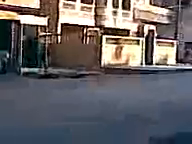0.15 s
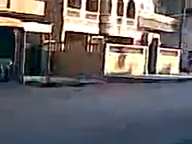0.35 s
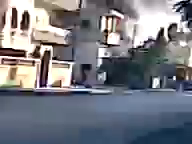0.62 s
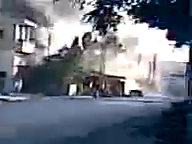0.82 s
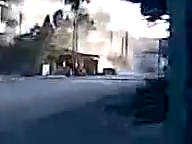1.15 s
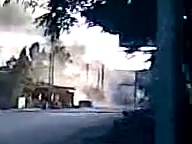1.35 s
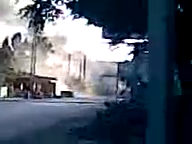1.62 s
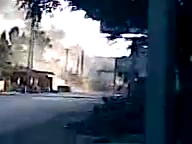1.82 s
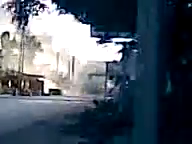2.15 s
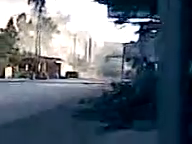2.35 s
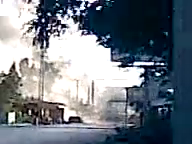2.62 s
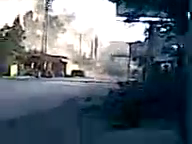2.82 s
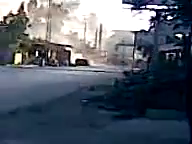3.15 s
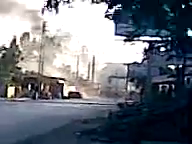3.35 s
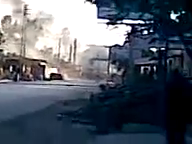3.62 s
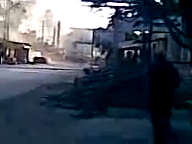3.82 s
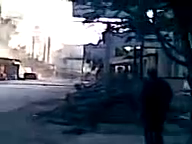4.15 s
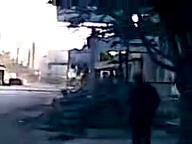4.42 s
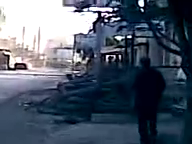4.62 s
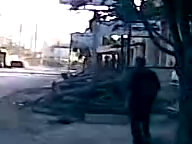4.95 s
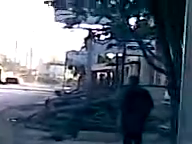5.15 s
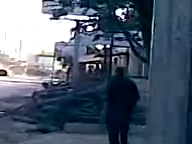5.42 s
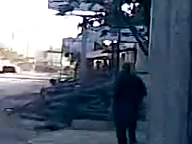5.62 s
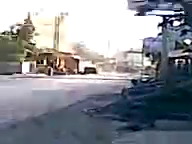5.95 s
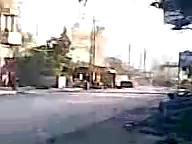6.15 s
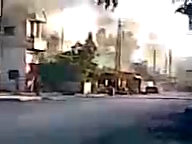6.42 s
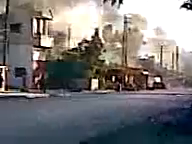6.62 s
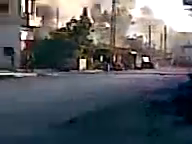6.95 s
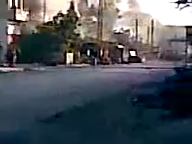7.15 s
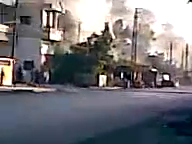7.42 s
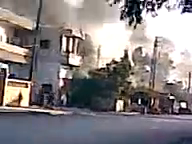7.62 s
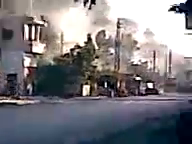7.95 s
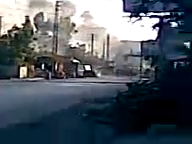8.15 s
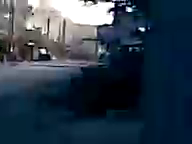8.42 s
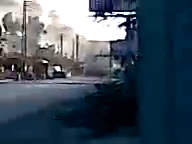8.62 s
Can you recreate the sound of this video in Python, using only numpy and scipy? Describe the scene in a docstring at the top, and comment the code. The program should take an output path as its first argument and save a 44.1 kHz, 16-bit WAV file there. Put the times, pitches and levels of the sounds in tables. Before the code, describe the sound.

Overloaded phone sound of street gunfire: a quick burst, sparse distant pops, then heavy close rifle cracks and a rolling, booming finish.

```python
"""Town street under gunfire: close rifle shots, bursts from a gun further off and far shots roll between house fronts.
Close shots and rolling echoes are coloured noise in two layers, a low boom and a bright crack.
Bursts, far shots and high snaps add short decaying rings, each with an echo in the same two layers.
A narrow-band phone microphone overloads on the close shots, and the loudest peaks are cut flat."""
import sys
import numpy as np
from scipy import signal
from scipy.fft import rfft, irfft, next_fast_len
from scipy.io import wavfile
from scipy.ndimage import uniform_filter1d

SR = 44100
rng = np.random.default_rng(int(sys.argv[2]) if len(sys.argv) > 2 else 0)


def digitize_waveform(pressure):
    """Quantize a signal to 16-bit integers and store it at the path in sys.argv[1].

    Rows of a 2-D input are taken as channels; values are limited to [-1, 1].
    """
    field = np.atleast_2d(pressure).T
    bounded = np.clip(field, -1, 1)
    quanta = np.round(bounded * 32767).astype(np.int16)
    wavfile.write(sys.argv[1], SR, quanta)


def magnitude_from_level(level_db):
    """Linear magnitude for a level in decibels (20 dB per decade)."""
    exponent = np.asarray(level_db, float) / 20
    return 10 ** exponent


N = 386757  # length in samples

# Close shots, and the rolling blast after 7 s:
# start_s, level_db, crack_over_boom_db, echo_t60_s, boom_lag_s (behind the crack)
CLOSE_SHOTS = [(3.54, -1, 0.5, 0.81, .001), (4.266, -1, -1.5, 0.89, .001), (5.066, -1, -2.5, 0.97, 0.002),
               (5.946, -1.5, -0.5, 0.86, 0.0011), (6.962, 1, -1, 0.64, 0.0029),
               (7.167, -14.5, 13.5, 0.5, 0.049), (7.199, 1.5, -1.5, 0.57, 0.024),
               (7.27, -17, 16, .7, 0.036), (7.294, -2.5, -6, 1, 0.0098), (7.874, -2.5, 1, 0.87, .001),
               (8.355, -0.5, -0.5, 0.75, 0.00091), (8.63, 1, -1.5, 0.69, 0.00089)]
# How a close shot comes back from the street, on top of its own decay: after_shot_s, boom_db, crack_db
STREET_RETURNS = [(0, -24.5, -2.5), (.012, -2, 2.5), (.035, -1.5, 0.5), (.06, -2, -2), (.09, -3.5, -5.5),
                  (0.119, -4, -0.5), (.125, -2, 2), (.16, -3.5, 0), (0.221, 1, -2), (0.319, -1, 3.5),
                  (.45, -1.5, -3), (.6, 5.5, 4.5), (.72, -6.5, -5)]
# Bursts of a gun down the street:
# start_s, level_db, ring_hz, crack_echo_over_blast_db, boom_echo_over_blast_db
GUN_BURSTS = [(0.195, -3, 1060, -19, -14.5), (0.242, -1.5, 671, -5.5, -10), (0.352, -2.5, 663, -8, -9),
              (0.461, -2.5, 656, -13, -7), (0.551, -6, 665, -7, -0.5), (0.642, 1, 666, -15.5, -10),
              (0.751, 2, 740, -20.5, -16), (0.844, 0, 675, -17.5, -8), (3.975, -7.5, 990, -6.5, -3),
              (4.091, -15, 974, -6.5, 2), (4.654, -3, 920, -6.5, -8), (4.777, -4.5, 834, -9, -2.5),
              (4.855, -2.5, 978, -9.5, -5), (4.953, 2, 943, -17.5, -11), (5.017, -3.5, 860, -14, -5.5),
              (5.216, 1, 814, -11, -8.5), (5.303, -2.5, 764, -9.5, -11), (5.411, 5.5, 840, -19, -17)]
# Short high-pitched snaps and slaps, most just ahead of a louder blast:
# start_s, level_db, ring_hz, crack_echo_over_snap_db, echo_t60_s
HIGH_SNAPS = [(0.201, 3.5, 1716, -11, 0.24), (5.618, 5, 1450, -7, 0.1), (6.909, -7, 3020, -21.5, 1),
              (8.334, -6.5, 2520, -30, .2)]
# Single far shots and sharp slaps off the houses:
# start_s, level_db, crack_echo_over_blast_db, boom_echo_over_blast_db
FAR_POPS = [(1.008, -23, -7, -2.5), (1.069, -16, -29, -7), (1.213, -18, -8, -1), (1.41, -28, -0.5, 7),
            (1.773, -33.5, -24, 2.5), (1.998, -37, -2, 4), (2.035, -38, 2, 0.5), (2.246, -35, -3, 0.5),
            (2.277, -42.5, 6.5, 7), (2.472, -35.5, -4, 2), (2.513, -36, -1, -4.5), (2.591, -20.5, 1, 5),
            (2.698, -22, -32, 2), (2.722, -26, 2, -9.5), (2.841, -6, -19, -9.5), (2.855, -14, -5, -10),
            (2.974, -22.5, -1.5, -1), (3.047, -10.5, -11, -4.5), (3.054, -7, -9, -9),
            (3.176, -20, -2.5, 0.5), (3.213, -8.5, -30, -12.5), (3.414, -14, -24, -9),
            (3.447, -15, -26, -4), (3.494, -12, -34, -14.5), (4.815, -18.5, -5.5, -2), (5.676, -5, -11, -7),
            (5.704, -0.5, -31, -6.5), (5.776, -5, -10, -12.5), (5.799, -2, -16, -6),
            (5.914, -6, -29, -13.5), (7.093, -3.5, -22, -5), (7.114, -5, -7.5, -8),
            (7.497, -6.5, -3.5, -7.5), (7.582, 0, -16.5, -15), (8.074, -6.5, -23, -19.5)]
# Lingering echo and far firing: time_s, boom_db, crack_db, boom_centre_hz
ROLLING_ECHO = [(0, -15, -11.5, 600), (.06, -23, -20.5, 680), (.19, -29, -31, 580), (.4, -26, -27, 650),
                (.9, -22, -34, 640), (1.05, -27.5, -40.5, 520), (1.19, -27, -41.5, 529),
                (1.4, -29, -36, 516), (1.48, -28.5, -27, 650), (1.6, -28.5, -37.5, 540),
                (1.67, -39, -36, 520), (1.82, -37.5, -36.5, 520), (2.0, -50.5, -47.5, 560),
                (2.2, -51, -48, 540), (2.45, -50, -50.5, 540), (2.68, -33, -37.5, 560),
                (3.1, -31, -33.5, 600), (3.25, -24, -36.5, 580), (3.38, -39.5, -38.5, 560),
                (3.6, -33.5, -33, 600), (3.72, -21, -22, 560), (3.979, -27, -27, 650),
                (4.06, -22.5, -22, 570), (4.26, -30, -27.5, 580), (4.5, -27.5, -26, 580),
                (4.6, -26, -30, 600), (4.7, -29, -25, 800), (5.0, -26, -30.5, 860), (5.2, -29, -21.5, 620),
                (5.6, -25, -28, 570), (5.74, -10.5, -13.5, 510), (5.94, -18.5, -22, 510),
                (6.2, -26.5, -25.5, 600), (6.5, -33, -27, 580), (6.6, -41.5, -30, 600),
                (6.66, -44.5, -36, 590), (6.71, -49, -46, 590), (6.93, -60, -54, 600),
                (7.15, -22, -22.5, 480), (7.261, -10.5, -15.5, 430), (7.31, -17, -10, 430),
                (7.37, -7, -6.5, 450), (7.5, -14, -15, 480), (7.66, -16, -13.5, 500),
                (7.85, -20.5, -18, 500), (8.15, -17, -31, 540), (8.35, -31, -25.5, 550),
                (8.45, -16, -17, 520), (8.6, -21, -21.5, 540), (8.7, -21, -17, 500),
                (8.77, -13.5, -17, 500)]
# Basic spectrum of the boom, before its moving colour: freq_hz, relative_db
BOOM_SPECTRUM = [(18, -56.5), (30, -11.5), (97, -15.5), (234, -4.5), (357, 0), (419, -1.5), (508, -1),
                 (638, -1), (697, -3.5), (990, -2.5), (2000, -22.5), (2600, -42.5), (4400, -120)]
# Basic spectrum of the crack, before its moving colour: freq_hz, relative_db
CRACK_SPECTRUM = [(500, -52.5), (900, -9.5), (1250, -4.5), (1800, -4.5), (2400, -8), (3100, -8.5),
                  (3600, -7.5), (4700, 2.5), (6000, -30)]
# Moving colour of the echo, before its slow wander: time_s, crack_centre_hz, crack_hump_db, middle_db
ECHO_COLOUR = [(0, 2100, 4.5, 3), (.25, 2040, 2.5, 4.5), (.4, 2630, 7, 2.5), (.65, 2900, 8.5, 3.5),
               (.95, 2795, 11, 2.5), (1.15, 2753, 9.5, -6.5), (1.4, 3100, 9.5, -2.5), (1.5, 3270, 6.5, 3),
               (1.68, 2500, 1, -1), (2.55, 2585, 7, 2.5), (2.6, 3530, 12, 2.5), (2.7, 2550, 11, 1),
               (2.86, 3230, 4.5, 5), (3.1, 2740, 1.5, 3), (3.2, 2960, 5, 0), (3.5, 2510, 6, -3.5),
               (4.6, 2397, 8.5, 0.5), (5.6, 2310, 6.5, -0.5), (6.4, 2400, 10, 2.5), (6.65, 2260, 20, 5),
               (6.85, 2266, 4.5, 3), (6.91, 2850, 23, -5), (6.97, 2400, 7.5, 0), (7.15, 2464, 9, 1.5),
               (7.19, 2634, 6.5, -2.5), (7.33, 2680, 7.5, -9.5), (7.4, 2443, 6, -0.5), (8.77, 2510, 8, 0)]
# Bass in the echo, before its lag and wander: time_s, bass_db
ECHO_BASS = [(0, 2), (.5, -3.5), (1, -2), (1.6, 5), (2.1, 4), (2.6, 2.5), (3.3, 3), (3.55, -2), (4.2, 2.5),
             (4.7, -0.5), (5.1, -2.5), (5.6, 1.5), (6.1, 3), (6.5, -4), (7, 2.5), (7.6, 3), (8.3, 0),
             (8.77, -2)]
# Narrow band of the phone: freq_hz, gain_db
PHONE_BAND = [(20, -30), (45, -5), (100, -2), (3400, -1), (3700, -10), (4000, -21.5), (4300, -34),
              (4550, -48.5), (4800, -90.5), (5000, -120)]

FLAT_TOP = 0.72  # peak ceiling, full scale = 1
POP_HZ, POP_SPREAD, POP_T60_S = 560, 0.08, 0.28  # mean ring, its relative spread, echo decay
BURST_T60_S = 0.1
SNAP_BOOM_DB = -8  # boom echo against crack echo
CRACK_WANDER_HZ, BASS_WANDER_DB, MIDDLE_WANDER_DB = 80, 1, 2  # rms
WANDER_S = 0.17  # smoothing window
BASS_LAG_PER_DB, BASS_LAG_S = 0.3, 0.031  # the bass gathers later than the rest of the boom


def read(points, hz):
    """Reads a spectrum joined by straight lines on a log frequency axis."""
    f, value = np.transpose(points)
    return np.interp(np.log(hz + 1), np.log(f + 1), value)


def colour(x, points):
    """Filters x by a spectrum in dB."""
    size = next_fast_len(len(x) + 4096)
    gain = magnitude_from_level(read(points, np.fft.rfftfreq(size, 1 / SR)))
    return irfft(rfft(x, size) * gain, size)[:len(x)]


def evened(x):
    """Scales to rms 1."""
    return x / np.sqrt(np.mean(x ** 2) + 1e-20)


def add(mix, s, sound):
    """Adds a sound into the mix at s seconds."""
    part = mix[..., max(round(s * SR), 0):][..., :sound.shape[-1]]
    part += sound[..., :part.shape[-1]]


def wander(s):
    """Slow random drift of rms 1, read at the times s."""
    drift = evened(uniform_filter1d(rng.standard_normal(N), size=round(WANDER_S * SR)))
    return drift[np.minimum(s * SR, N - 1).astype(int)]


def close_echoes():
    """Power of boom and crack after each close shot: the street's pattern on the shot's own decay."""
    after, boom_db, crack_db = np.transpose(STREET_RETURNS)
    t = np.arange(0, after[-1], 1 / SR)
    street_boom_db, street_crack_db = np.interp(t, after, boom_db), np.interp(t, after, crack_db)
    power = np.zeros((2, N))
    for s, db, over_db, t60, lag in CLOSE_SHOTS:
        fall_db = db - 60 * t / t60
        add(power[0], s + max(lag, 0), magnitude_from_level(street_boom_db + fall_db) ** 2)
        add(power[1], s, magnitude_from_level(street_crack_db + fall_db + over_db) ** 2)
    return power


def blasts(table, cycles, bounce_s, bounce_db):
    """Each blast arrives as a few cycles of a dying ring, with a ground bounce close behind."""
    t, out = np.arange(SR // 20) / SR, np.zeros(N)
    for s, db, hz, *_ in table:
        envelope = magnitude_from_level(db - 20 * (t * hz / cycles) ** 3)
        attack = np.minimum(t * hz / 0.92, 1)
        ring = envelope * np.sin(2 * np.pi * hz * t) * attack
        add(out, s, ring)
        add(out, s + bounce_s, magnitude_from_level(bounce_db) * ring)
    return out


def gun_bursts():
    """Rapid blasts from down the street, each ringing at its own pitch with a faint bounce."""
    return blasts(GUN_BURSTS, cycles=4.4, bounce_s=0.011, bounce_db=-24)


def high_snaps():
    """Snaps and slaps: very short, high-pitched rings with a quick bounce."""
    return blasts(HIGH_SNAPS, cycles=2.5, bounce_s=0.003, bounce_db=-12)


def far_pops():
    """Far shots and slaps: low rings of slightly random pitch with a strong bounce."""
    pitches_hz = POP_HZ * (1 + POP_SPREAD * rng.standard_normal(len(FAR_POPS)))
    rows = [(s, db, hz) for (s, db, *_), hz in zip(FAR_POPS, pitches_hz)]
    return blasts(rows, cycles=3.8, bounce_s=0.013, bounce_db=-6.5)


def blast_echoes():
    """Power of the short smear of reflections behind each burst blast, far pop and snap."""
    t, power = np.arange(SR // 2) / SR, np.zeros((2, N))
    rise = np.minimum(t / [[0.007], [0.001]], 1)  # the boom gathers later than the crack
    rows = [(s, db + boom_db, db + crack_db, BURST_T60_S) for s, db, hz, crack_db, boom_db in GUN_BURSTS]
    rows += [(s, db + boom_db, db + crack_db, POP_T60_S) for s, db, crack_db, boom_db in FAR_POPS]
    rows += [(s, db + crack_db + SNAP_BOOM_DB, db + crack_db, t60)
             for s, db, hz, crack_db, t60 in HIGH_SNAPS]
    for s, boom_db, crack_db, t60 in rows:
        add(power, s, rise * magnitude_from_level([[boom_db], [crack_db]] - 60 * t / t60) ** 2)
    return power


def rolling_echo():
    """Power of boom and crack in the lingering echo and far firing, as levels joined by dB lines."""
    at, boom_db, crack_db, _ = np.transpose(ROLLING_ECHO)
    t = np.arange(N) / SR
    return np.array([magnitude_from_level(np.interp(t, at, db)) ** 2 for db in (boom_db, crack_db)])


def echo_noise(points, s, centre_hz, bass_db, middle_db, lift_db, octaves, patchy_db, flicker_db):
    """Coloured noise for the echo: a moving hump, lasting coloured patches and wide level flicker."""
    hop, size = 128, 512  # samples
    frames, hz = N // hop + 5, np.fft.rfftfreq(size, 1 / SR)[:, None]
    real, imag, patches = rng.standard_normal((frames, size // 2 + 1, 3)).T
    patches = uniform_filter1d(patches, size=3, axis=0)  # across neighbouring pitches
    patches = evened(uniform_filter1d(patches, size=16, axis=1))  # lasting in time
    flicker = evened(uniform_filter1d(rng.standard_normal(frames), size=2))
    t = np.arange(frames) * hop / SR
    away = np.log2((hz + 1) / np.interp(t, s, centre_hz))  # octaves from the hump
    hump = np.interp(t, s, lift_db + 0 * s) * np.exp(-(away / octaves) ** 2)
    bass = np.interp(t, s, bass_db) / (1 + (hz / 330) ** 6)
    middle = np.interp(t, s, middle_db) * np.exp(-(np.log2((hz + 1) / 1150) / 0.46) ** 4)
    shape = magnitude_from_level(hump + bass + middle)
    shape /= np.sqrt(((shape * magnitude_from_level(read(points, hz))) ** 2).sum(axis=0))  # the colour leaves the power alone
    z = (real + 1j * imag) * shape * magnitude_from_level(patchy_db * patches + flicker_db * flicker)
    noise = signal.istft(z, nperseg=size, noverlap=size - hop)[1][:N]
    return evened(colour(noise, points))


def lagging_bass(s, boom):
    """Bass level in dB: it follows the boom's level late, so it thins on a rise and swells on a fall."""
    now_db = 20 * np.log10(boom[(s * SR).astype(int)])
    keep = np.exp(-s[1] / BASS_LAG_S)
    earlier_db = signal.lfilter([1 - keep], [1, -keep], now_db - now_db[0]) + now_db[0]
    lag_db = BASS_LAG_PER_DB * (earlier_db - now_db)
    return np.interp(s, *np.transpose(ECHO_BASS)) + lag_db + BASS_WANDER_DB * wander(s)


def street_echo():
    """Echo powers add up and drive the boom and the crack of the street."""
    boom, crack = np.sqrt(rolling_echo() + close_echoes() + blast_echoes())
    s = np.arange(0, N / SR, 0.01)
    bass_db = lagging_bass(s, boom)
    at, *columns = np.transpose(ECHO_COLOUR)
    crack_hz, hump_db, middle_db = (np.interp(s, at, column) for column in columns)
    middle_db = middle_db + MIDDLE_WANDER_DB * wander(s)
    roll_at, _, _, centre_hz = np.transpose(ROLLING_ECHO)
    boom_hz = np.interp(s, roll_at, centre_hz)
    crack_hz = crack_hz + CRACK_WANDER_HZ * wander(s)
    boom *= echo_noise(BOOM_SPECTRUM, s, boom_hz, bass_db, middle_db,
                       lift_db=8, octaves=0.33, patchy_db=2.5, flicker_db=1.5)
    crack *= echo_noise(CRACK_SPECTRUM, s, crack_hz, bass_db, middle_db,
                        lift_db=hump_db, octaves=0.4, patchy_db=3, flicker_db=1.5)
    return boom + crack


def scene():
    """Sums the street's echo and the direct blasts into one channel."""
    return (street_echo() + gun_bursts() + high_snaps() + far_pops())[None]


def roll_off(x):
    """The treble ends steeply here."""
    return signal.sosfilt(signal.butter(12, 16510, fs=SR, output="sos"), x)


def record(dry):
    """The microphone saturates softly, the phone narrows the band, and the loudest peaks are cut flat."""
    squeezed = 1.902 * np.tanh(dry[0] / 1.81)
    narrow = colour(squeezed, PHONE_BAND)
    mix = np.clip(narrow, -FLAT_TOP, FLAT_TOP)[None]
    return roll_off(mix)


dry = scene()
out = record(dry)
digitize_waveform(out)
```